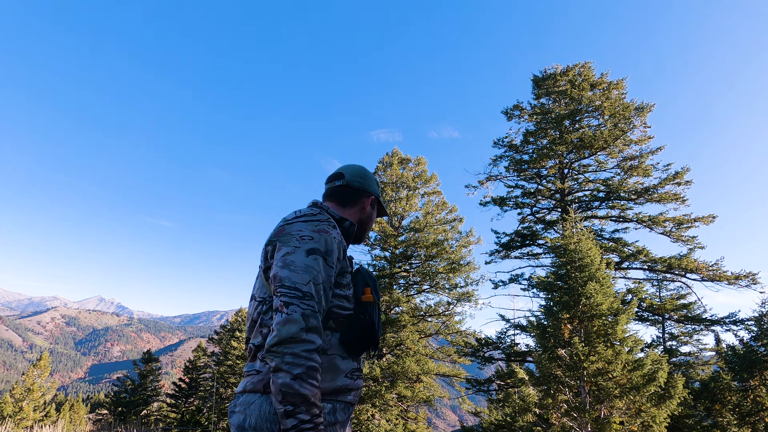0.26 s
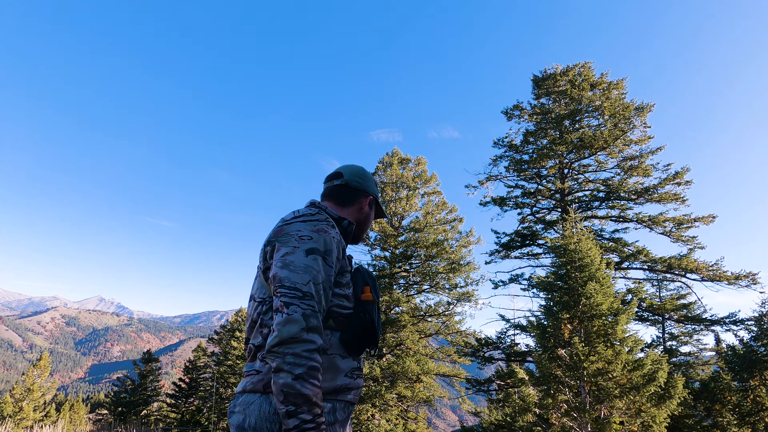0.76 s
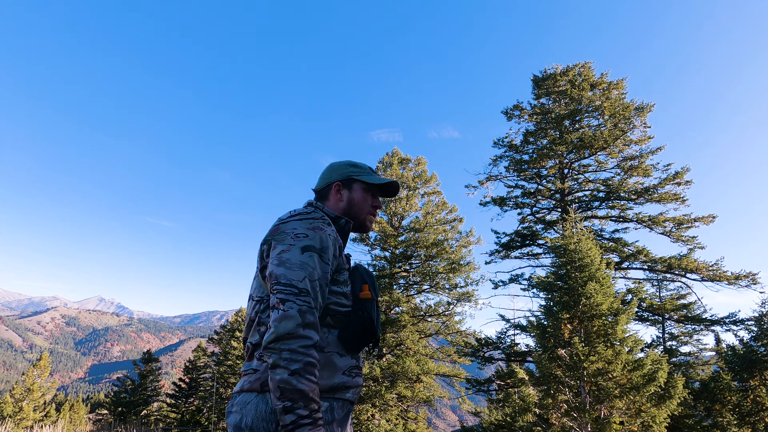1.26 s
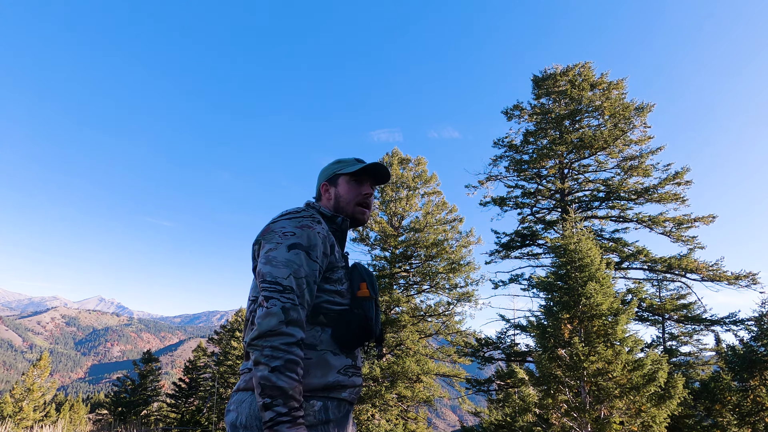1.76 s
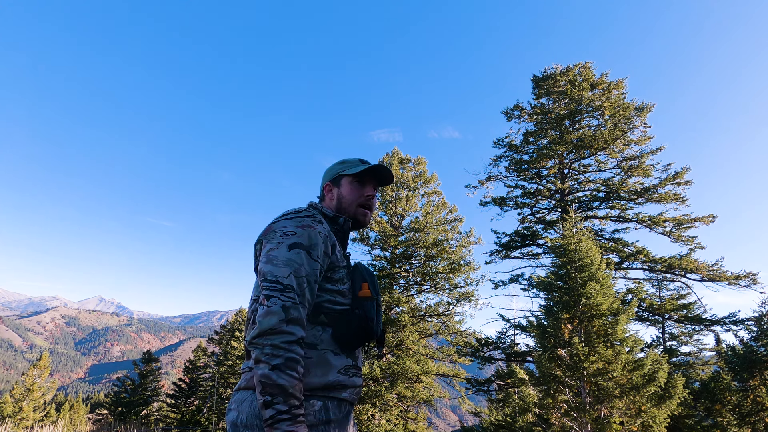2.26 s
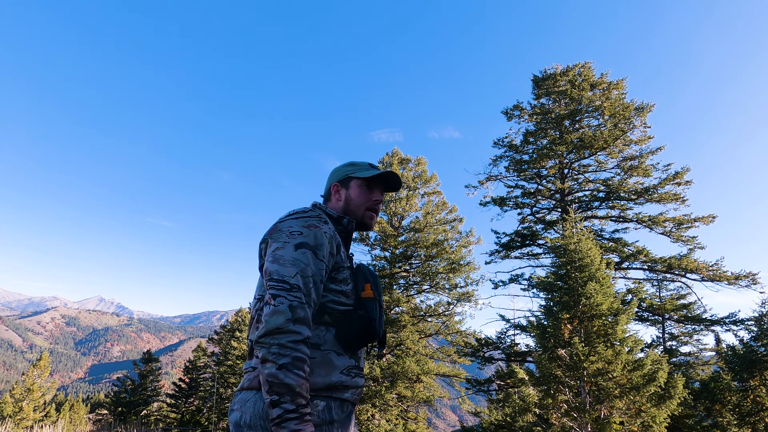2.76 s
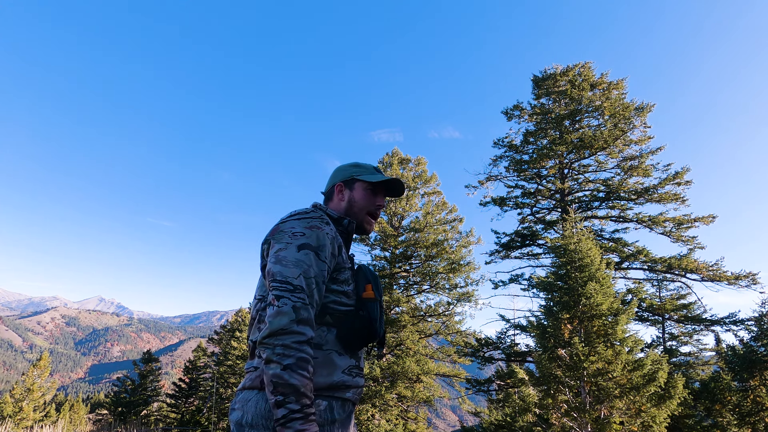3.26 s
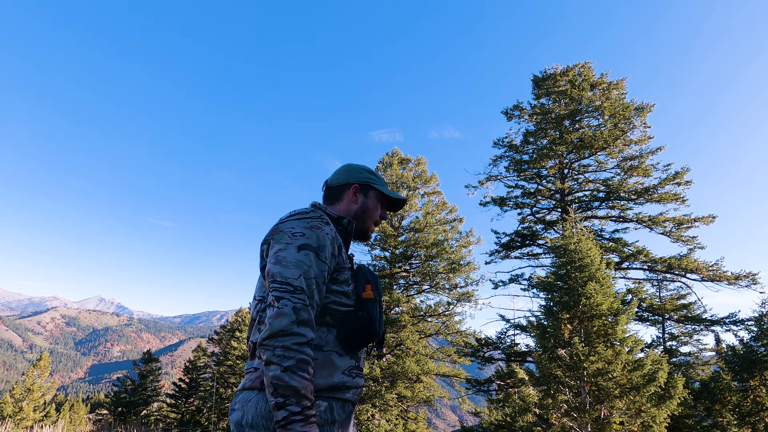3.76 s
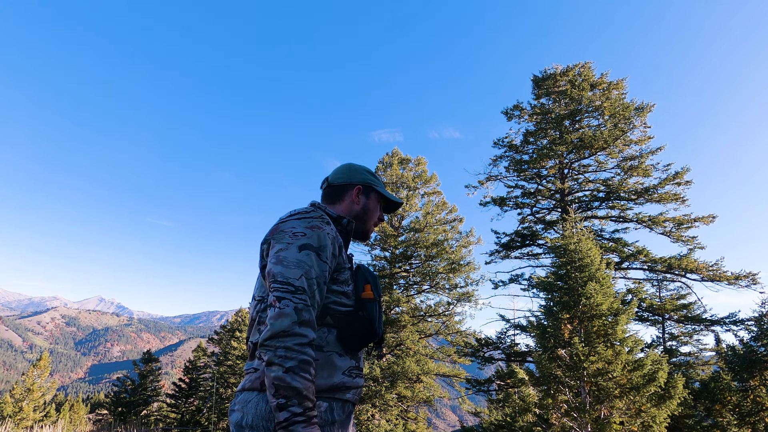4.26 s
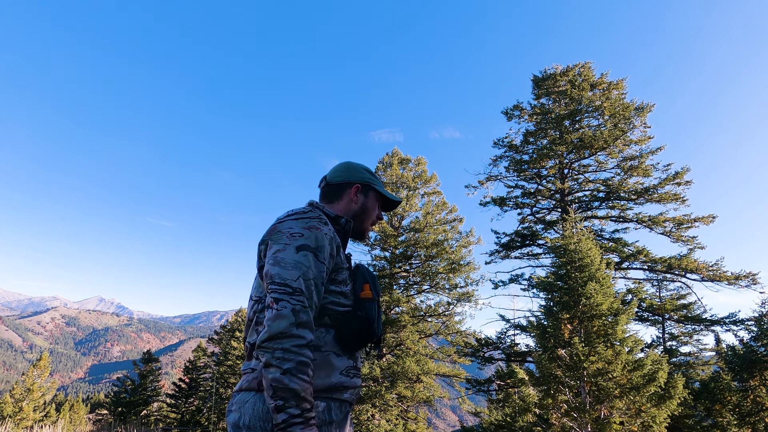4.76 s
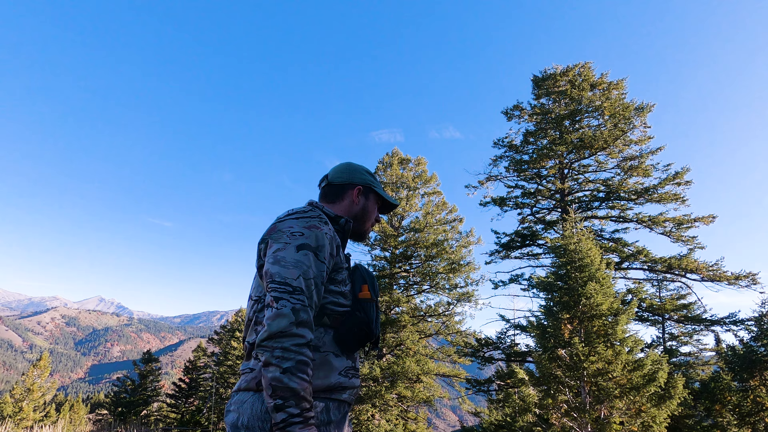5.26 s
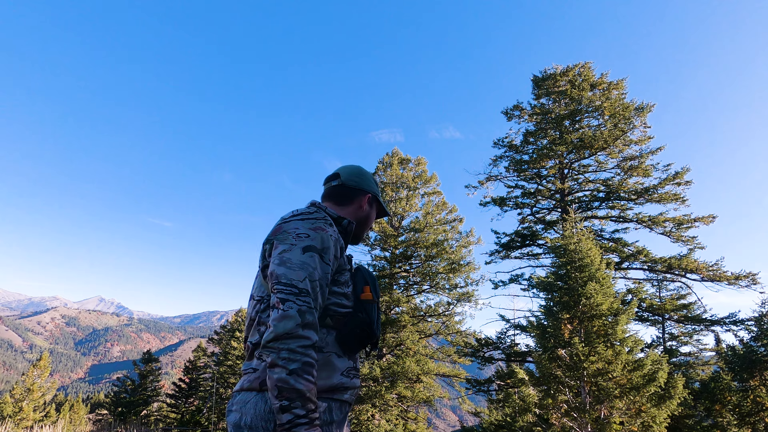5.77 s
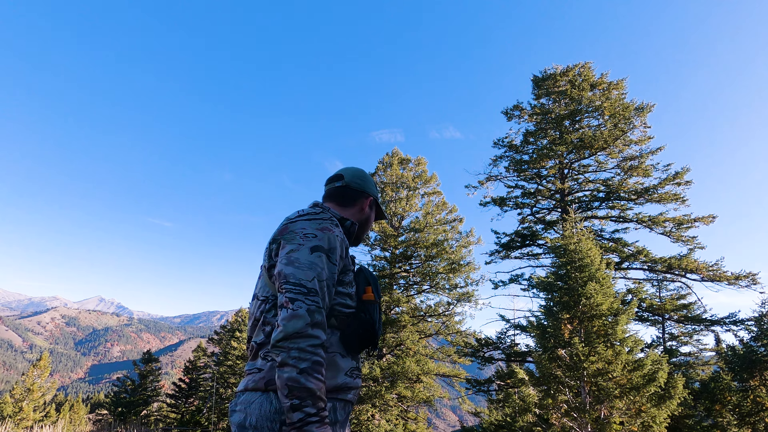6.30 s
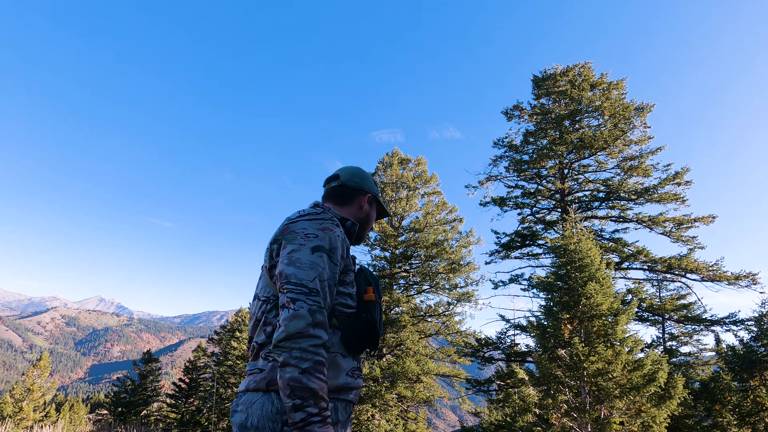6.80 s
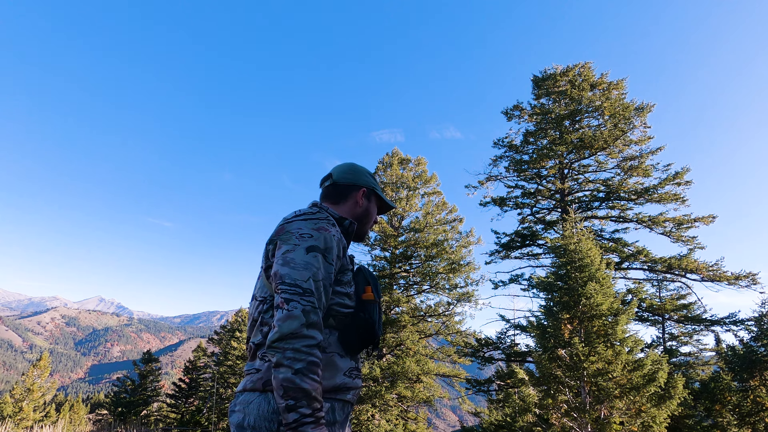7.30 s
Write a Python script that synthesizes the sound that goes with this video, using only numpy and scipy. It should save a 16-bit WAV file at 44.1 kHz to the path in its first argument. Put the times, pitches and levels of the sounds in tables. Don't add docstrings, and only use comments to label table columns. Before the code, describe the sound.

Quiet outdoor air, soft wind hiss and low rumble, with a few tiny bird chirps. Wet lip pops and spit sputter, then a man close by blows five elk cow mews on a mouth reed: bright, nasal, rising slightly, holding, then sliding down low. They come about a second apart, loud against the hush, with a faint echo from trees. The background dips under each call; a raspy bird chirps before the last.

```python
import sys
import numpy as np
from scipy import signal
from scipy.fft import rfft, irfft, next_fast_len
from scipy.io import wavfile
from scipy.ndimage import uniform_filter1d, minimum_filter1d

SR = 44100
rng = np.random.default_rng(int(sys.argv[2]) if len(sys.argv) > 2 else 0)


def transcribe(u):
    v = np.clip(np.atleast_2d(u).T, -1, 1)
    q = np.round(v * 32767).astype(np.int16)
    wavfile.write(sys.argv[1], SR, q)


def boost(x):
    u = np.asarray(x, float) / 20
    return 10 ** u


N = 332514

# t/s, pitch f/Hz, effort level/dB, reed slap level/dB over the effort,
# mouth opening/1 (factor on the mouth's frequencies)
MEW_1 = [(2.072, 1272, -14.5, 12, 0.81), (2.12, 1417, -29.5, 7.5, 0.91), (2.23, 1386, -26, 5, 0.85),
         (2.28, 1273, -29.5, 7.5, 0.85), (2.34, 1010, -22, 2, 1.08), (2.41, 743, -33.5, 13.5, 1.07),
         (2.46, 593.3, -29, 8.5, 1.03), (2.54, 348.8, -33, 11, 1.03), (2.6, 196.1, -40.5, -8, 1.01)]
MEW_2_RISE = [(3.207, 1558, -15.5, 0, 0.96), (3.245, 1500, -20, 0, 0.91), (3.28, 1555, -14.5, -3.5, 0.83),
              (3.345, 1667, -17.5, -8, 0.92), (3.405, 1760, -12.5, -5, 0.84), (3.45, 1653, -45, -7.5, 1)]
MEW_2_FALL = [(3.428, 1585, -32.5, -2, 0.86), (3.466, 1755, -13.5, -7.5, 0.83),
              (3.495, 1673, -20.5, -0.5, 0.77), (3.555, 1375, -23, 9.5, 0.94), (3.61, 1264, -29, 7.5, 0.96),
              (3.7, 929, -24.5, 1, 0.94), (3.78, 729.5, -25, 5.5, 0.95), (3.96, 534.8, -32, 7.5, 1),
              (4.06, 382.5, -45.5, 12.5, 0.83)]
MEW_3 = [(4.742, 1044, -19.5, 8.5, 0.93), (4.797, 1338, -20, -1, 1), (4.895, 1442, -13, -4.5, 0.96),
         (4.93, 1536, -24, 1.5, 1), (5.033, 1525, -17, 1.5, 1), (5.12, 1229, -26, 4, 0.93),
         (5.165, 960, -28.5, -0.5, 0.95), (5.25, 418.4, -31, 11, 1), (5.35, 206, -41.5, -14, 0.84)]
MEW_4 = [(5.937, 1692, -33.5, -15.5, 1), (5.98, 1468, -14, -2.5, 0.9), (6.05, 1505, -17, -7, 0.91),
         (6.12, 1646, -12, -7, 0.73), (6.27, 1400, -21, -6, 0.96), (6.37, 1048, -26, 0.5, 0.88),
         (6.475, 833, -27.5, 0, 0.79), (6.765, 595.7, -30.5, 8, 0.92), (6.88, 284, -50, -4, 0.88)]
MEW_5 = [(7.089, 1484, -25, -2.5, 0.79), (7.12, 1456, -15.5, -5.5, 0.94), (7.255, 1617, -15, -7.5, 0.84),
         (7.295, 1574, -20, -5, 0.94), (7.335, 1340, -24.5, 3, 0.89), (7.38, 866, -28.5, 6.5, 0.97),
         (7.45, 471.3, -34, 13, 0.91), (7.48, 336.5, -39, 6.5, 0.94), (7.535, 204, -42, 3, .92)]
# table, dullness/(dB/octave) on the high hold, added dullness/(dB/octave) per octave of sag,
# air leak level/dB, release t/s
MEWS = [
    (MEW_1, 8.6, 3.25, -50, 0.046),
    (MEW_2_RISE, 8.5, 1.5, -40.5, 0.046),
    (MEW_2_FALL, 5.4, 1.02, -43.5, 0.049),
    (MEW_3, 7.4, 4, -51.5, 0.038),
    (MEW_4, 5.1, 8.26, -54.5, 0.048),
    (MEW_5, 3, 6.15, -51, .025),
]
# f/Hz, level/dB
MOUTH = [(700, -31.5), (1500, -15.5), (2200, .5), (2900, -6.5), (3600, -4.5), (4000, -9), (4500, -19),
         (5500, -30), (6500, -35.5), (7800, -32), (9000, -44), (10500, -38), (13000, -45), (15000, -57)]
# f/Hz, width/Hz, level/dB
NOTCHES = [(1297, 39, -7), (1512, 29, -3), (2980, 90, -0.5)]
# f/Hz, width/Hz, level/dB
LEAK = [(2373, 1000, 1), (3305, 270, -3), (7480, 930, -21)]
# t/s, peak level/dB, f/Hz, upper ring level/dB
POPS = [(0.0532, -42, 1775, -17), (1.572, -48.5, 1650, 5.5), (1.6013, -53, 2000, 5.5),
        (1.6669, -40.5, 2780, 4.5), (1.7005, -43.5, 2200, -5), (1.734, -42.5, 2200, -25),
        (1.8168, -45.5, 2180, -27.5), (2.008, -37.5, 2340, -19.5), (2.017, -36, 2600, -19),
        (2.0287, -21.5, 2530, -15), (2.0377, -26, 2140, -18.5), (2.051, -13.5, 2254, -32),
        (2.0581, -18, 1910, -13.5), (2.0689, -16, 2220, -15.5), (2.0799, 2, 2650, -14),
        (2.592, -44.5, 2370, -0.5), (2.6304, -57.5, 2750, -15), (2.7916, -48.5, 2220, -14),
        (2.857, -43, 2140, -3.5), (2.8674, -45, 2110, -12.5), (2.8827, -42.5, 2200, -3.5),
        (2.8985, -51, 2125, -0.5), (2.9164, -52, 2200, -1.5), (2.952, -48.5, 2650, 2.5),
        (3.1817, -40.5, 2390, -10), (3.186, -37, 2100, -14), (4.7034, -48.5, 2160, 0),
        (5.907, -50, 1600, -6), (7.0413, -51, 2030, -3), (7.0653, -49, 1630, -11)]
# t/s, level/dB, f/Hz
TICKS = [(2.593, -49, 5500), (2.6304, -59, 7760), (2.899, -58.5, 8000), (2.868, -64, 8000),
         (2.952, -61, 8000), (4.7027, -42.5, 6240), (4.736, -55, 4500), (5.383, -60.5, 8230),
         (7.043, -52.5, 6000)]
# t/s, length/s, first level/dB, swell over the burst/dB
SPUTTER = [(1.66, 0.028, -43.5, -10.5), (1.68, .16, -55.5, -4), (2.005, 0.018, -51.5, 3),
           (2.025, .052, -38, 6.5), (2.072, 0.11, -35, -14), (2.85, .11, -46.5, -16), (3.178, .032, -45, 7),
           (3.415, 0.069, -48.5, -4.5), (4.535, .035, -43, -18.5), (4.708, .034, -41, 10),
           (7.06, 0.035, -56, 9)]
# delay t/s, level/dB
GROUND = [(.0045, -11), (.0054, -28), (0.002113, -26.5), (.0084, -15)]
# f/Hz, level/dB
PORT_TILT = [(60, -11), (130, -5.5), (290, -0.5), (620, -1.5), (1360, -2.5), (2980, 0), (6510, -3.5),
             (14200, -17)]
# f/Hz, t60/s
TREES = [(300, 0.38), (1500, 1.2), (2400, 1.27), (4000, 0.98), (9000, 0.48)]
# t/s, first f/Hz, top f/Hz, last f/Hz, level/dB
CHIRPS = [
    (0.643, 6500, 6800, 4800, -66),
    (0.903, 6800, 7450, 4930, -62),
    (1.785, 6760, 6500, 5020, -66),
    (6.825, 5850, 7400, 6550, -51.5),
    (6.895, 4233, 6630, 4910, -45),
    (6.988, 4295, 5420, 6360, -39),
]
# t/s, rumble level/dB
GUSTS = [(0, -2), (1, -4), (2, -7.5), (2.5, -11), (3, 1.5), (3.5, -2), (3.9, 1.5), (4.4, 2.5),
         (5.001, -1.5), (5.5, -1.5), (6, 6), (6.601, 2.5), (7.001, 2.5), (7.54, -3)]
# f/Hz, level/dB per Hz
WIND = [(18, -64), (30, -34), (49, -15.5), (80, -27), (166, -5), (467, -15), (893, -18.5), (1190, -15),
        (1890, -18), (2330, -19), (2790, -21.5), (6570, -33.5), (8730, -45.5), (13200, -51), (14700, -66)]
# f/Hz, correlation/1
WIND_LIKENESS = [(60, 0.41), (180, 0.24), (530, 0.13), (1600, 0.11), (4760, 0.01), (14200, 0.01)]

HOLD_HZ = 1500
FLAP_DB, LEAK_SAG_DB = 1.8, 5
ATTACK_S, RELEASE_DB = 0.0061, -21.5
SNAP_DB, SNAP_SHARE, SNAP_SINK = -50.5, .5, 0.76
CHIRP_S, CLEAR_DB, RASP_PER_DB = .068, -64, .025
LAG_S = 1.8 / SR
WIND_DB = -51


def mew(rows, dull_db, slack_db, leak_db, release_s):
    s, *columns = np.transpose(rows)
    t = np.arange(s[0], s[-1], 1 / SR)
    effort_db, slap_db, opening = (uniform_filter1d(np.interp(t, s, c), size=300) for c in columns[1:])
    hz = glide(t, s, columns[0])
    slack = np.maximum(np.log2(HOLD_HZ / hz), 0)
    turns = np.cumsum(hz * (1 + 0.0027 * drift(len(t), 130))) / SR
    tone = np.zeros(len(t))
    for k in range(1, 41):
        over_db = slap_db + read(MOUTH, k * hz / opening)
        over_db = over_db - (dull_db + slack_db * slack) * np.log2(k / 3)
        over_db = over_db - 120 * (k * hz > SR / 2)
        over_db = over_db + FLAP_DB * np.minimum(slack, 1) * drift(len(t), 1100)
        notch_db = sum(db * np.exp(-((k * hz - f) / w) ** 2) for f, w, db in NOTCHES)
        waver = .3 * min(k, 8) + 3.5 * np.clip(k * hz / 1500 - 2.6, 0, 1)
        waver_db = waver * drift(len(t), 350)
        level = boost(effort_db + (k > 1) * over_db + waver_db + notch_db)
        tone += np.sqrt(2) * level * np.cos(2 * np.pi * k * turns + .5 * k * k)
    leak = boost(leak_db - LEAK_SAG_DB * slack) * fizz(count=len(t), puff_db=3.4)
    left_s = s[-1] - t
    fade = np.clip(np.minimum((t - s[0]) / ATTACK_S, left_s / .008), 0, 1) ** 2.5
    release = boost(RELEASE_DB * np.clip(1 - left_s / release_s, 0, 1))
    return s[0], (tone + leak) * fade * release


def glide(t, s, hz):
    y, step = np.log(hz), np.diff(s)
    rate = np.diff(y) / step
    both = rate[:-1] * rate[1:]
    inner = 2 * np.maximum(both, 0) / (rate[:-1] + rate[1:] + 1e-9)
    slope = np.r_[rate[0], inner, rate[-1]]
    i = np.clip(np.searchsorted(s, t, "right") - 1, 0, len(step) - 1)
    u = (t - s[i]) / step[i]
    bend = step[i] * u * (1 - u) * ((1 - u) * (slope[i] - rate[i]) - u * (slope[i + 1] - rate[i]))
    return np.exp(y[i] + u * step[i] * rate[i] + bend)


def fizz(count, puff_db):
    air = rng.standard_normal(SR)[:count] * boost(puff_db * drift(count, 60))
    return evened(sum(boost(db) * ring(air, f, w) for f, w, db in LEAK))


def pops(out):
    t = np.arange(600) / SR
    for s, db, hz, upper_db in POPS:
        rings = sum(boost(d) * np.sin(2 * np.pi * f * t) for f, d in [(hz, 0), (3600, upper_db)])
        hiss = evened(ring(rng.standard_normal(len(t)), 6300, 5000))
        snap = boost(SNAP_DB + SNAP_SHARE * upper_db - SNAP_SINK * db) * hiss * np.exp(-t / 0.0013)
        swell = t / 0.00038 * np.exp(1 - t / 0.0009)
        add(out, s, boost(db - 2.5) * (rings * swell + snap))


def ticks(out):
    t = np.arange(600) / SR
    for s, db, hz in TICKS:
        burst = evened(ring(rng.standard_normal(len(t)), hz, 0.78 * (9200 - hz)))
        add(out, s, boost(db) * burst * np.exp(-t / 0.0026))


def sputter(out):
    for s, length, db, swell_db in SPUTTER:
        u = np.linspace(0, 1, int(length * SR))
        level = boost(db + swell_db * u) * signal.windows.tukey(len(u), .2)
        add(out, s, level * fizz(count=len(u), puff_db=4.0))


def limiter(x):
    swing = -minimum_filter1d(-abs(x), size=160)
    swing_db = 20 * np.log10(uniform_filter1d(swing, size=160) + 1e-9)
    return x * boost(-.7 * np.maximum(swing_db + 15.5, 0))


def ports(x):
    size = next_fast_len(N)
    hz = np.fft.rfftfreq(size, 1 / SR)
    phase = np.pi * np.minimum(hz, 6000) * LAG_S
    half = boost(read(PORT_TILT, hz) / 2) * np.exp(-1j * phase)
    return irfft(rfft(x, size) * np.array([half, 1 / half]), size)[:, :N]


def ducking(x):
    power_db = 10 * np.log10(abs(uniform_filter1d(x ** 2, size=300)) + 1e-12)
    over_db, t = np.maximum(power_db + 40, 0), np.arange(N) / SR

    def held(share, pace):
        return np.maximum.accumulate(share * over_db + pace * t) - pace * t

    return boost(-uniform_filter1d(held(0.63, 170.0) + held(0.28, 2.9), size=300))


def trees(x):
    hz, t, z = signal.stft(rng.standard_normal((2, SR)), SR, nperseg=256)
    decay = boost(-60 * t / read(TREES, hz)[:, None]) * np.clip(t / 0.018, 0, 1)
    tail = signal.istft(z * decay, SR, nperseg=256)[1]
    return signal.fftconvolve(x[None], tail / np.linalg.norm(tail[0]), axes=1)[:, :N]


def bird():
    out = np.zeros(N)
    for s, first, top, last, db in CHIRPS:
        rasp = np.clip(RASP_PER_DB * (db - CLEAR_DB), 0, 1)
        u = np.linspace(0, 1, int(CHIRP_S * SR))
        hz = first * (1 - u) + last * u + 4 * u * (1 - u) * (top - (first + last) / 2)
        shake = 1 - rasp + rasp * drift(len(u), 28)
        swell = np.sqrt(abs(np.sin(np.pi * u)) ** 2)
        add(out, s, boost(db) * shake * swell * np.sin(2 * np.pi * np.cumsum(hz) / SR))
    smear = rng.standard_normal((2, SR)) * np.exp(-np.arange(SR) / 1200.0)
    echo = signal.oaconvolve(out[None], smear / np.linalg.norm(smear[0]), axes=1)[:, :N]
    return out + .6 * echo


def rumble():
    a, b = rng.standard_normal((2, N))
    gust_db = np.interp(np.arange(N) / SR, *np.transpose(GUSTS))
    return boost(-55.5 + gust_db) * evened(ring(np.array([a + .6 * b, a - 0.53 * b]), 164.7, 55))


def wind():
    frames, hz = N // 256 + 5, np.fft.rfftfreq(1024, 1 / SR)
    a, b, c, d, patches = rng.standard_normal((frames, len(hz), 5)).T
    patches = evened(uniform_filter1d(uniform_filter1d(patches, size=10, axis=0), size=12, axis=1))
    same = np.clip(read(WIND_LIKENESS, hz), -1, 1)[:, None]
    left = a + 1j * b
    z = np.array([left, same * left + np.sqrt(1 - same ** 2) * (c + 1j * d)])
    z *= boost(read(WIND, hz)[:, None] + .8 * patches + .3 * drift(frames, 40))
    return boost(WIND_DB) * evened(signal.istft(z, nperseg=1024, noverlap=768)[1][:, :N])


def evened(x):
    return x / np.sqrt(np.mean(x ** 2) + 1e-20)


def read(points, hz):
    f, value = np.transpose(points)
    return np.interp(np.log(hz + 1), np.log(f + 1), value)


def add(mix, s, sound):
    part = mix[round(s * SR):][:len(sound)]
    part += sound[:len(part)]


def ring(x, hz, width):
    b, a = signal.iirpeak(hz, hz / width, SR)
    return signal.lfilter(b, a, signal.lfilter(b, a, x))


def drift(count, span):
    noise = uniform_filter1d(rng.standard_normal(SR), int(span))
    return evened(uniform_filter1d(noise, int(span)))[:count]


def scene():
    caller = np.zeros(N)
    pops(caller)
    ticks(caller)
    sputter(caller)
    for row in MEWS:
        add(caller, *mew(*row))
    reflected = sum(boost(db) * np.roll(caller, round(s * SR)) for s, db in GROUND)
    near = limiter(caller + reflected)
    far = boost(-19.5) * trees(near) + wind() + rumble() + bird()
    return ports(near) + ducking(near) * far


def low_pass(x):
    return signal.sosfilt(signal.butter(12, 14810, fs=SR, output="sos"), x)


def record(dry):
    low_cut = signal.butter(3, 55, "high", fs=SR, output="sos")
    return low_pass(signal.sosfilt(low_cut, dry))


dry = scene()
out = record(dry)
transcribe(out)
```